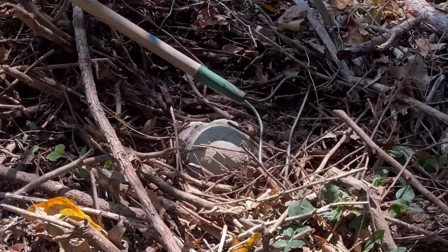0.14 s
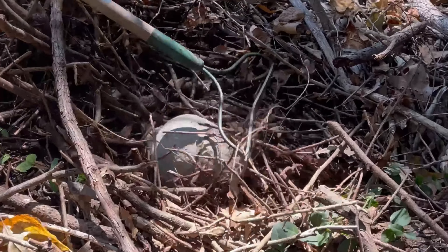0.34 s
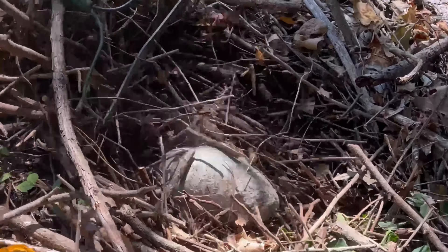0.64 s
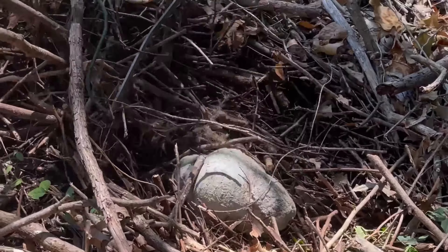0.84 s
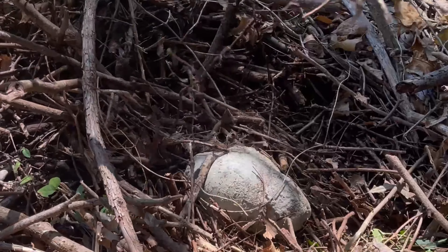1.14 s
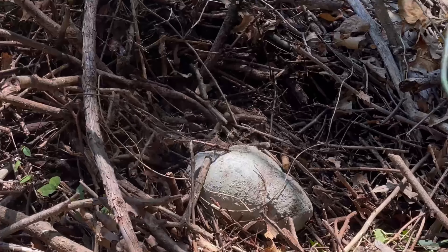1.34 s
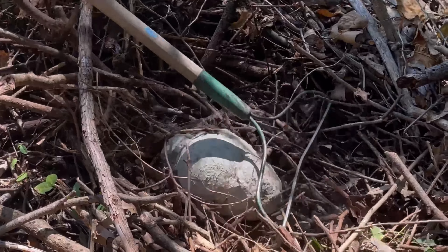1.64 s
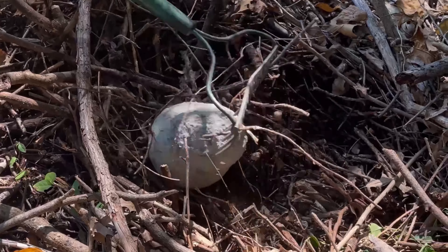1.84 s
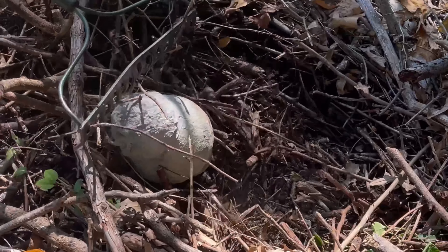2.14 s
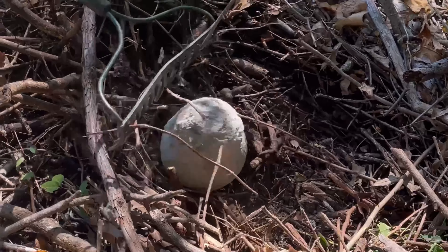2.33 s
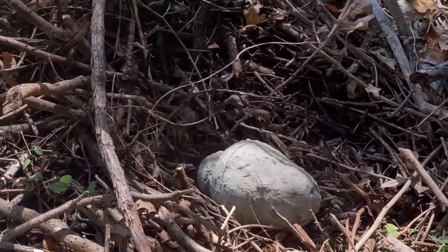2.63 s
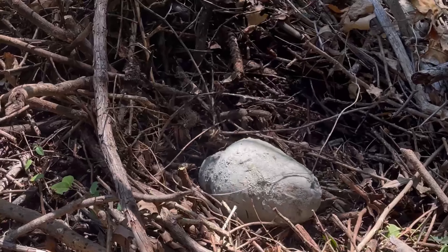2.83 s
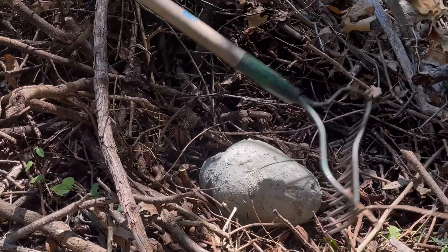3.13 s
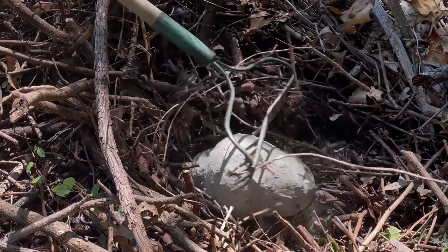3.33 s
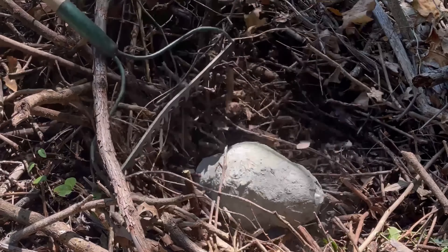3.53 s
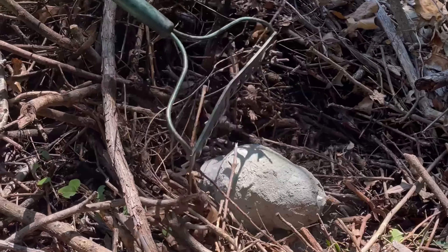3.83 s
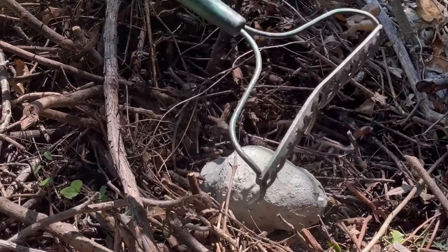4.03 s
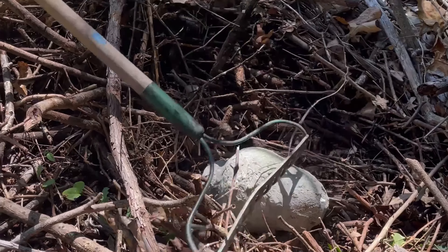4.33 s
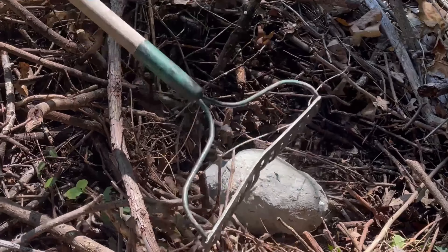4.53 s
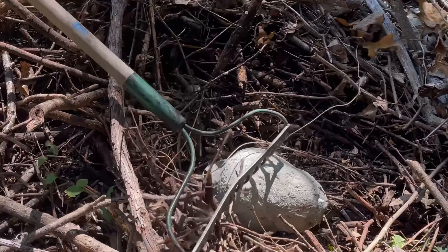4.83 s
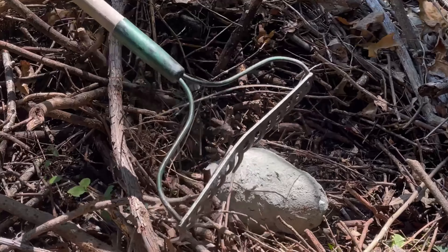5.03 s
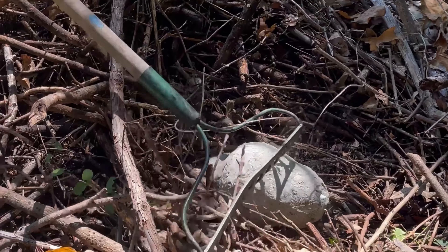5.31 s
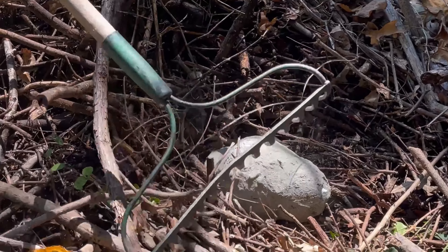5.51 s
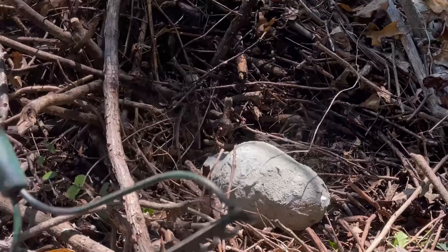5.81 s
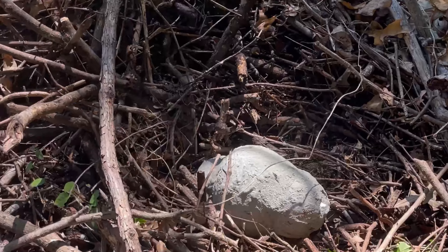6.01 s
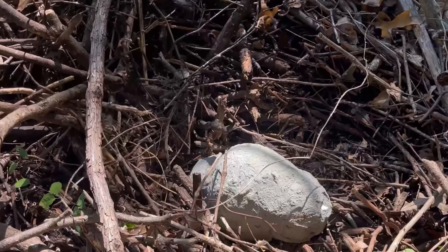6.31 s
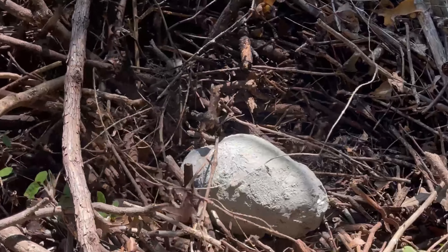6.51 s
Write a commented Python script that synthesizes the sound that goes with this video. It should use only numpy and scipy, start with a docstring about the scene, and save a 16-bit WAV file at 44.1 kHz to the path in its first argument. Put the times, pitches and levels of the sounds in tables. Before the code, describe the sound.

Dry litter rustles and twigs snap in fits as rake tines drag and flick, ringing briefly. Quiet gaps separate the strokes. Midway a sharp loud whack lands, followed by three spaced chopping hits with woody cracks and muted thuds, then dense crunchy snapping at the end. A soft far engine rumble and wavering whine continue underneath. Close stereo pickup in open air, crisp and dry.

```python
"""Thuds, crunches, metallic pings and snapping twigs, close by outdoors, over rustling leaves and a far engine.
A steel garden rake pokes and chops at a large puffball in a pile of dry twigs and dead leaves.
Hits are ragged decaying noise through spectra and resonances; the tines ring as decaying sines.
Leaves and twigs are random ticks and noise that follow the strokes.
The engine, perhaps an aircraft, is filtered noise and wavering tones; its rumble swells, its thin whine sinks."""
import sys
import numpy as np
from scipy import signal
from scipy.fft import rfft, irfft, next_fast_len
from scipy.io import wavfile
from scipy.ndimage import uniform_filter1d, map_coordinates

SR = 44100
rng = np.random.default_rng(int(sys.argv[2]) if len(sys.argv) > 2 else 0)


def transcribe(u):
    """Save the signal u as a 16-bit wav file named by the first command-line argument.

    u: samples, shape (n,) or (channels, n), limited to [-1, 1]; the rate is SR.
    q: integer samples, one column per channel.
    """
    v = np.clip(np.atleast_2d(u).T, -1, 1)
    q = np.round(v * 32767).astype(np.int16)
    wavfile.write(sys.argv[1], SR, q)


N = 293706

T = np.arange(N) / SR
AGE = T[:SR // 4]  # time since the start of a hit [s]
LEFT = np.array([[1], [-1]])  # signs of the left and right channel

# rake head landings, before fixed trims: (time [s], level [dB], thud re level [dB], crunch re level [dB],
# time scale of the litter giving way [s], hollow resonance [Hz], struck stick [Hz], stick re crack [dB])
BLOW_EVENTS = [(1.474, -29.5, -9, 2, 0.042, 397, 2300, -10), (1.491, -21, -11, 3.5, 0.069, 477, 2720, -12),
               (3.169, -6, -12, -31, 0.024, 754, 3020, -5), (4.3394, -5, -22, -17, 0.02, 530, 2750, -4.5),
               (4.356, -10.5, -17.5, -6.5, 0.023, 400, 2980, -4.5),
               (4.7894, -8.5, -13, -6, 0.024, 520, 2500, -4.5),
               (4.8073, -19.5, -10, -10, 0.02, 1100, 1800, -1),
               (5.2078, -5, -15.5, -31, 0.012, 680, 2840, -5),
               (5.2138, -17, -16, -17, 0.013, 1060, 2830, 8.5),
               (5.2226, -24, -10, -10, 0.0084, 900, 2620, -11),
               (6.4313, -18.5, -13, -1, 0.013, 406, 2210, -3),
               (6.4363, -38.5, 8, -14, 0.017, 250, 2400, -8),
               (6.5672, -16, -13, -12.5, 0.0053, 670, 2260, -2.5),
               (6.5803, -33.5, 2.5, -18.5, 0.0063, 486, 2200, -4)]
# free modes of the rake head, the first pair is the bending of the tines: (frequency [Hz], level [dB], t60 [s])
RAKE_MODES = [(1966, 7, 0.13), (1980, -3.5, 0.066), (2476, -6, 0.095), (2640, -10, 0.029),
              (3030, -14, 0.11), (3203, 0, 0.093), (3614, -4.5, 0.1), (4450, -3.5, 0.042),
              (4850, -9, 0.084), (5580, -8, 0.023), (5680, -15.5, 0.065), (5930, 1.5, 0.028),
              (7580, -6, 0.038), (8150, -3, 0.026)]
# spectrum of breaking wood: (frequency [Hz], level [dB])
CRACK_SPECTRUM = [(300, 3.5), (1200, -8.5), (1900, 6), (2600, 6), (3200, 4), (3700, -2.5), (4400, 4),
                  (5600, 1.5), (7000, -5), (12000, -63)]
# spectrum of crushed litter and sharp edges: (frequency [Hz], level [dB])
CRUNCH_SPECTRUM = [(300, -6), (2000, -9), (4500, -3.5), (6000, -0.5), (8000, -0.5), (10200, 9.5),
                   (11200, 6.5), (12200, -10.5), (14000, -32)]


def undb(db):
    """Decibels to gain."""
    return 10 ** (np.asarray(db) / 20)


def unit(x):
    """Scale to an rms of 1."""
    return x / np.sqrt(np.mean(x ** 2))


def burst(x):
    """Scale a hit so that its loudest 4 ms have an rms of 1."""
    power = uniform_filter1d(np.mean(x ** 2, axis=0), size=176)
    return x / np.sqrt(power.max())


def curves(table):
    """The columns of a table, joined by straight lines in time."""
    time_s, *columns = np.transpose(table)
    return [np.interp(T, time_s, column) for column in columns]


def colour(x, spectrum):
    """Minimum-phase filter with the given spectrum, by folding the cepstrum."""
    points_hz, points_db = np.transpose(spectrum)
    n = next_fast_len(x.shape[-1] + len(AGE), True)
    hz = np.maximum(np.arange(n // 2 + 1) * SR / n, 1)
    gain = undb(np.interp(np.log(hz), np.log(points_hz), points_db))
    cepstrum = irfft(np.log(gain), n)
    cepstrum[1:n // 2] *= 2
    cepstrum[n // 2 + 1:] = 0
    response = np.exp(rfft(cepstrum))
    return irfft(rfft(x, n) * response, n)[..., :x.shape[-1]]


def resonate(x, hz, q):
    """One resonance, gain 1 at its centre."""
    b, a = signal.iirpeak(hz, q, fs=SR)
    return signal.lfilter(b, a, x)


def noise(n, spread):
    """Left and right noise: a shared part and an opposed part of weight spread."""
    mid, side = rng.standard_normal((2, n))
    return np.array([mid + spread * side, mid - spread * side])


def walk(rate_hz):
    """Smooth random wander, rms 1, through rate_hz random knots a second."""
    knots = rng.standard_normal(4096)
    return unit(map_coordinates(knots, [T * rate_hz], order=3, mode="wrap"))


def fade(t60_s):
    """Exponential decay, 60 dB down after t60_s."""
    return np.exp(-np.log(1000) * AGE / t60_s)


def add(track, time_s, sound):
    """Mix a sound into the track at time_s."""
    i = int(time_s * SR)
    track[:, i:i + sound.shape[1]] += sound[:, :max(N - i, 0)]


def splinters(spread, ragged_db, rise_s):
    """Noise that swells and comes in ragged millisecond spurts, as fibres break one after another."""
    spurts = np.repeat(rng.standard_normal(len(AGE)), 44)[:len(AGE)]
    swell = 1 - np.exp(-AGE / rise_s)
    return noise(len(AGE), spread) * undb(ragged_db * spurts) * swell


def blows():
    """The head thuds into the soft mass, crunches litter and cracks a stick, which rings and shakes the steel."""
    # (frequency [Hz], level [dB])
    thud_spectrum = [(60, -28), (200, -4), (330, 19.5), (520, 16.5), (750, 17.5), (1100, 22), (1500, 1),
                     (2500, -4), (8000, -37)]
    out = np.zeros((2, N))
    for time_s, level_db, thud_db, crunch_db, give_s, hollow_hz, stick_hz, stick_db in BLOW_EVENTS:
        impact = splinters(spread=0.19, ragged_db=8.0, rise_s=0.00037) * fade(1.62 * give_s)
        mass = burst(colour(impact, thud_spectrum))
        hollow = burst(resonate(impact, hollow_hz, q=3))
        thud = (0.9 * mass + 0.7 * hollow) * undb(2.5 * LEFT)

        fracture = splinters(spread=0.78, ragged_db=1.0, rise_s=0.0004) * fade(4.3 * give_s)
        steel = np.zeros_like(fracture)
        for hz, mode_db, t60_s in RAKE_MODES:
            q = np.pi * hz * 0.7 * t60_s / np.log(1000)  # rings for 0.7 of the free time
            steel += undb(mode_db) * resonate(fracture, hz, q)
        knock = splinters(spread=0.37, ragged_db=0.0, rise_s=0.00027) * fade(2.8 * give_s)
        stick = resonate(knock, stick_hz, q=7)
        crack = undb(-10.0) * burst(colour(fracture, CRACK_SPECTRUM))
        crack += undb(-16.5) * burst(steel) + undb(stick_db - 4.5) * burst(stick)

        settling = fade(give_s) + undb(-12.5) * fade(0.29)
        crunch = colour(splinters(spread=0.19, ragged_db=4, rise_s=0.0002) * settling, CRUNCH_SPECTRUM)
        hit = crack + undb(thud_db + 7.5) * burst(thud) + undb(crunch_db + 0.5) * burst(crunch)
        add(out, time_s, undb(level_db) * hit)
    return out


def pings():
    """A tick sets the steel ringing; each contact point favours other modes, and the litter damps them fast."""
    # tine flicks off a stick, before fixed trims: (time [s], level [dB], upper modes re level [dB],
    # tick re level [dB], chatter re level [dB], ring time re free [ratio], favoured mode [Hz])
    ping_events = [(0.4613, -27, 10.5, 10, 3.5, 1, 5650), (0.4712, -21.5, 6.5, 1, -15, 0.37, 2480),
                   (0.4933, -27, 3, -1, -14, 0.56, 2420), (0.5501, -26.5, 3, 12, -10, 0.46, 2500),
                   (1.508, -32, 6, 6, -13, 0.88, 3660), (1.5917, -44, 15, 15, -6, 0.56, 3600),
                   (1.6282, -31.5, 5, -22, -21, 0.54, 3530), (2.1257, -28.5, 8, -10, -2.5, 1, 3320),
                   (2.631, -23, 15.5, -6, -2.5, 0.37, 3600), (2.6385, -21.5, -5, -9, -15, 1, 4330),
                   (2.6466, -31, -2, -17, -15, 0.76, 3250), (2.6626, -33, 2, 6, -15, 0.48, 3610),
                   (2.6953, -27.5, -2, -14, -14, 0.73, 3250), (2.7172, -25, -3, -12, -15, 0.65, 3620),
                   (3.171, -30, 9, 20.5, 1, 0.32, 3250), (3.1883, -26, 0, 6, -5, 0.7, 3210),
                   (3.5162, -35.5, -24, -17, -30, 0.36, 2470), (4.341, -24.5, 20.5, 14, 3, 0.54, 3450),
                   (4.3574, -38, -1, 8, 2, 0.54, 3230), (4.79, -31.5, 24.5, 26, -1, 0.41, 3440),
                   (4.8084, -30, -3, -8, -14, .6, 2450), (5.2095, -19, 12.5, 11, -17, 0.53, 3430),
                   (5.2147, -26, 12, -2, -12, 0.83, 6160), (5.223, -27, -7, -3, -11, 0.91, 3630)]
    out = np.zeros((2, N))
    hz, mode_db, t60_s = np.transpose(RAKE_MODES)
    upper = np.arange(len(RAKE_MODES)) > 1
    for time_s, level_db, upper_db, tick_db, chatter_db, freedom, favoured_hz in ping_events:
        detune, skew, start = rng.standard_normal((3, len(RAKE_MODES)))
        gain = undb(mode_db + 14.0 * np.exp(-((hz - favoured_hz) / 250) ** 2))
        decays = np.array([fade(t * freedom) for t in t60_s])
        # sticks pressed against the tines shift the modes a little
        phase = 2 * np.pi * np.outer(hz * (1 + 0.004 * detune), AGE)
        phase += (np.pi * upper * start)[:, None]
        modes = np.array([decays * np.sin(phase + side * 0.3 * skew[:, None]) for side in (1, -1)])
        ring = undb(1.0) * burst((gain * ~upper) @ modes)
        ring += undb(upper_db - 7.0) * burst((gain * upper) @ modes)

        tick_decay = fade(0.013) + undb(-6) * fade(0.12)
        tick = colour(splinters(spread=1.0, ragged_db=2, rise_s=0.00022) * tick_decay, CRUNCH_SPECTRUM)
        chatter = colour(splinters(spread=1.0, ragged_db=3.5, rise_s=0.00034) * fade(0.14), CRACK_SPECTRUM)
        hit = ring + undb(tick_db - 5.0) * burst(tick) + undb(chatter_db) * burst(chatter)
        add(out, time_s, undb(level_db) * hit)
    return out


def snaps():
    """A sudden fracture rings the twig, briefly if it lies buried and longer if free, and scatters in the pile."""
    # twig snaps, before fixed trims: (time [s], level [dB], twig pitch [Hz], wood re level [dB],
    # scatter t60 [s], ring sharpness [Q])
    snap_events = [(0.0442, -18, 6400, -19, 0.07, 6), (0.3635, -16.5, 4240, -2, 0.028, 30),
                   (0.4397, -14, 2600, -8, 0.061, 20), (0.4927, -11, 2470, -4, 0.016, 8),
                   (0.523, -25, 1200, 1, 0.04, 9), (0.5478, -6, 3560, -16, 0.026, 8),
                   (0.5605, -21, 3500, -8, 0.035, 14), (0.5648, -17, 2900, -10, .025, 10),
                   (0.6046, -18, 5940, -11, 0.035, 8), (0.612, -17, 6030, -19, 0.064, 8),
                   (0.649, -18, 3000, -14, 0.044, 2.4), (0.8187, -20.5, 6800, -12, 0.21, 7),
                   (1.0685, -11.5, 2470, 6.5, 0.011, 2.8), (1.0698, -14.5, 3570, 1.5, .012, 3.4),
                   (1.262, -30, 6040, -8, .04, 6), (1.403, -34, 5500, -3, .03, 5),
                   (1.461, -19, 5200, -17, 0.057, 7), (1.469, -16, 6300, -12, 0.075, 7),
                   (1.48, -12.5, 5500, -3, 0.23, 6), (1.488, -15, 3280, -2, .03, 7),
                   (1.503, -17, 3000, 1, .04, 7), (1.52, -19, 4600, -1, .07, 7),
                   (1.5545, -14.5, 4050, 5, 0.037, 9.9), (1.779, -13.5, 2580, -9, 0.044, 50),
                   (1.899, -13.5, 2760, 4.5, 0.0078, 8.7), (1.9852, -14.5, 2680, -17, 0.028, 14),
                   (2.0647, -13.5, 6700, -4, 0.069, 7), (2.089, -22, 3010, -4, 0.035, 20),
                   (2.108, -22, 3230, 0, .03, 25), (2.116, -12, 2550, -7, 0.047, 27),
                   (2.1257, -21, 5560, 19, 0.033, 10), (2.127, -25, 4530, 17, 0.05, 8.8),
                   (2.162, -20.5, 6200, 0, 0.062, 7), (2.193, -16.5, 6000, -8, 0.05, 7),
                   (2.201, -11.5, 6340, -16, 0.057, 7), (2.536, -20, 5530, 5, 0.028, 6.1),
                   (2.554, -18, 5700, -13, 0.033, 6.5), (2.7067, -14.5, 5100, -8, 0.067, 7),
                   (2.7924, -24.5, 5500, 5.5, 0.016, 6), (2.792, -30, 1400, 12.5, 0.015, 4),
                   (2.881, -26, 6040, -17, .015, 6), (3.17, -12, 4000, 7, 0.046, 3.3),
                   (3.17, -16, 5570, 16, .02, 12), (3.1757, -13, 5300, 9, 0.035, 8),
                   (3.184, -17, 3180, 8, .04, 18), (3.33, -11.5, 2940, -9, 0.033, 63),
                   (3.33, -16.5, 5700, 1, .026, 8), (3.378, -14, 2980, -4, 0.022, 18),
                   (3.378, -18, 5700, 4.5, 0.028, 5.2), (3.7573, -16, 2735, -13, 0.037, 14),
                   (4.132, -22.5, 6000, -8, 0.056, 7), (4.3528, -8, 4900, -26, 0.034, 6),
                   (4.356, -13, 3200, 7, 0.017, 7), (4.4323, -16, 5200, -20, 0.053, 7),
                   (4.577, -19, 5470, 1.5, 0.05, 4.4), (4.79, -24, 3300, 9, .012, 6),
                   (4.791, -16, 7340, 11, 0.024, 6), (4.8067, -12, 6000, -6, 0.036, 5.2),
                   (5.208, -16, 7800, 9, 0.043, 6), (5.341, -19.5, 6500, -15, 0.033, 7),
                   (5.375, -23, 6500, -15, .015, 7), (5.397, -19, 6200, -12, 0.024, 7),
                   (5.5782, -23.5, 2560, 14, 0.0067, 2.3), (5.601, -25.5, 6800, -3, 0.039, 7),
                   (5.945, -22, 2620, 3, 0.01, 15), (5.961, -16, 6260, -8, .03, 8),
                   (6.044, -10.5, 5400, 5.5, 0.041, 7.2), (6.0465, -9, 4750, -2, 0.059, 36),
                   (6.0485, -12.5, 7400, 4, .03, 14), (6.0755, -11, 2180, -7.5, 0.1, 16),
                   (6.111, -9.5, 5700, -16, 0.018, 8), (6.111, -16, 2200, 1.5, 0.021, 4.3),
                   (6.1743, -17, 5540, -7, 0.045, 8), (6.2371, -11.5, 2966, -10, 0.037, 18),
                   (6.3194, -13, 3960, -15, 0.029, 3.3), (6.4051, -12, 1600, -10, 0.02, 3),
                   (6.445, -11, 5730, -4, 0.026, 7), (6.46, -14, 2700, -3, .025, 12),
                   (6.507, -20, 2720, 0, .015, 12), (6.522, -17, 2440, -3.5, 0.03, 12),
                   (6.6057, -7.5, 5600, -14, 0.063, 10), (6.6171, -1, 5840, -12, 0.017, 8.2)]
    # a crooked twig also rings in a second plane: share above its pitch, level
    second_split, second_db = 0.068, -13
    out = np.zeros((2, N))
    for time_s, level_db, hz, wood_db, scatter_s, q in snap_events:
        decay = fade(0.0035) + undb(-6.5) * fade(scatter_s)
        fracture = splinters(spread=1.0, ragged_db=1.5, rise_s=0.00024) * decay
        edge = burst(colour(fracture, CRUNCH_SPECTRUM))
        bend = resonate(fracture, hz, q=1)
        twig = burst(resonate(bend, hz, q))
        twig += undb(second_db) * burst(resonate(bend, hz * (1 + second_split), q=2.9))
        body = burst(resonate(resonate(fracture, 2500, q=1), 580, q=1))
        body *= 3800 / hz  # thick, low twigs have more body
        wood = undb(-13.0) * burst(twig) + undb(-27.0) * body
        add(out, time_s, undb(level_db) * (undb(-8.5) * edge + undb(wood_db) * wood))
    return out


def squeaks():
    """A tine squeaks along a twig: a thin, rough note of resonant noise that swells and stops."""
    # (time [s], length [s], level [dB], pitch [Hz])
    squeak_events = [(0.402, 0.05, -40, 5700), (2.598, 0.025, -39, 5520)]
    out = np.zeros((2, N))
    for time_s, length_s, level_db, hz in squeak_events:
        pressure = np.sin(np.pi * np.minimum(AGE / length_s, 1))
        note = resonate(noise(len(AGE), spread=0.3) * pressure, hz, q=27)
        add(out, time_s, undb(level_db) * burst(note))
    return out


def rustle():
    """Dry leaves hiss under the resting tines; in a stroke edges tick and dragged twigs crackle, in fits and starts."""
    # (frequency [Hz], level [dB])
    leaf_spectrum = [(150, -9), (600, -3), (2300, -1.5), (4000, -8.5), (5200, -1.5), (6800, 0.5),
                     (8500, 1.5), (10400, 10), (11300, 4), (12200, -10.5), (14000, -40)]
    rest, stir, scrape = stirring()
    ticks = grains(np.geomspace(2500, 11500, num=14), rate_hz=45, scatter_db=4.2, q=4, tail_s=0.02)
    sliding = unit(noise(N, spread=0.068))
    twigs = grains(np.geomspace(1500, 6000, num=10), rate_hz=26, scatter_db=4.5, q=16, tail_s=0.015)
    twigs = unit(resonate(twigs, 3000, q=1))
    catch = unit(undb(2.6 * walk(68)))  # a dragged tine catches and slips: the level wanders
    resting = unit(colour(0.6 * ticks + sliding, leaf_spectrum))
    moving = unit(colour(ticks + 0.4 * sliding, leaf_spectrum))
    share = stir / (rest + stir)
    leaves = (1 - share) * resting + share * moving * catch
    return np.hypot(rest, stir) * leaves + scrape * catch * twigs


def grains(pitches_hz, rate_hz, scatter_db, q, tail_s):
    """Random ticks, most of them faint, rate_hz a second at each pitch, each with a short scattered tail."""
    out = np.zeros((2, N))
    for hz in pitches_hz:
        chance = rng.random(N)
        size = np.minimum(rng.exponential(size=N), 3)
        hits = (chance < rate_hz / SR) * undb(scatter_db * size)
        crinkle = noise(len(AGE), spread=0.7) * (fade(0.005) + undb(-12) * fade(tail_s))
        grain = 2.9 * unit(crinkle) + unit(resonate(crinkle, hz, q))
        out += signal.fftconvolve(hits[None], grain, axes=1)[:, :N]
    return unit(out)


def push(peak_s, level_db, swell_s, settle_s):
    """Power of one movement: it swells 20 dB in swell_s up to peak_s, then falls 20 dB in settle_s."""
    away = np.maximum((peak_s - T) / swell_s, (T - peak_s) / settle_s)
    return undb(level_db - 20 * away) ** 2


def stirring():
    """Gains of resting leaves, moving leaves and twigs: strokes move leaves and twigs; blows shake only leaves."""
    # strokes through the litter: (hardest push [s], leaves [dB], twigs [dB], 20 dB swell [s], 20 dB settling [s])
    stroke_events = [(0.06, -39, -50, 0.044, 0.078), (0.565, -22.5, -39.5, 0.28, 0.13),
                     (0.85, -41.5, -72, 1, 1), (1.492, -32, -22, 0.026, 0.034),
                     (2.105, -32.5, -44, 0.69, 0.13), (2.55, -38, -56, 0.67, 0.11),
                     (3.35, -35, -42, 0.11, 0.34), (3.76, -38, -49, 0.28, 0.18),
                     (5.359, -46, -66, 0.072, 1), (5.66, -37, -58, 0.58, 0.098),
                     (5.949, -29, -44, 0.06, 0.12), (6.095, -23, -39, 0.094, 0.12),
                     (6.24, -34, -48, 0.48, .35), (6.445, -26.5, -34.5, 0.037, 0.25)]
    # the tines lie in the litter: (start [s], end [s])
    contact_spans = [(0, 1.2), (1.47, 2.88), (3.17, 5.8), (5.92, 8.3)]
    contact_db, lifted_db, lift_s = -48.5, -60, 0.059  # under the resting tines, left alone, lifting time
    # leaves shaken by a blow: level re blow, time from blow to peak, 20 dB times
    shake_db, shake_delay_s, shake_swell_s, shake_settle_s = -32, 0.0025, 0.061, 0.15

    touching = sum(1.0 * ((T >= start_s) & (T < end_s)) for start_s, end_s in contact_spans)
    touching = uniform_filter1d(touching, int(lift_s * SR))
    resting = undb(lifted_db) ** 2 + touching * undb(contact_db) ** 2
    leaves, twigs = np.zeros(N), np.zeros(N)
    for time_s, level_db, *_ in BLOW_EVENTS:
        leaves += push(time_s + shake_delay_s, level_db + shake_db, shake_swell_s, shake_settle_s)
    for peak_s, leaves_db, twigs_db, swell_s, settle_s in stroke_events:
        stroke = push(peak_s, 0, swell_s, settle_s)
        leaves += undb(leaves_db) ** 2 * stroke
        twigs += undb(twigs_db) ** 2 * stroke
    return np.sqrt(resting), np.sqrt(leaves), np.sqrt(twigs)


def engine():
    """Far-off rumble and rush, with tones smeared by the moving air; whine and drone sink together."""
    # (time [s], rumble [dB], rush [dB])
    noise_levels = [(0, -34, -41), (1.3, -32, -41.5), (2.7, -31, -38), (3.3, -30.5, -38.5), (3.6, -27, -37),
                    (4.4, -29, -36), (5.1, -27, -35.5), (6.0, -30, -37), (6.66, -32, -36)]
    # (time [s], whine pitch [Hz], whine [dB], drone [dB], hum [dB])
    tone_levels = [(0, 1234, -57, -79, -63), (1.3, 1235, -52, -69, -48), (2.1, 1215, -51, -62, -36),
                   (2.7, 1208, -48, -63, -35), (3.3, 1185, -56, -66, -43), (3.85, 1207, -47.5, -45, -41.5),
                   (4.6, 1135, -50, -53, -36), (4.85, 1103, -45.5, -42, -43.5), (5.15, 1096, -49, -43, -37),
                   (5.3, 1106, -46.5, -72, -42), (5.55, 1089, -38.5, -61, -34), (5.74, 1074, -39, -63, -39),
                   (5.83, 1091, -49, -70, -39), (5.98, 1082, -36.5, -91, -43), (6.15, 1080, -47, -72, -38),
                   (6.26, 1080, -41.5, -72, -33), (6.36, 1080, -53, -72, -45), (6.66, 1072, -41, -72, -48)]
    # second, purer whine that roughly holds its pitch: (time [s], pitch [Hz], level [dB])
    held_levels = [(0, 1231, -59), (0.55, 1240, -51), (0.72, 1242, -59), (1.2, 1228, -51),
                   (1.28, 1192, -41), (1.33, 1243, -56), (2.7, 1241, -49), (3.6, 1229, -52),
                   (5.5, 1222, -66), (6.1, 1233, -56), (6.27, 1214, -43), (6.4, 1213, -49),
                   (6.66, 1220, -51)]
    # (frequency [Hz], level [dB])
    rumble_spectrum = [(15, -62), (28, -20), (42, -12.5), (60, -2), (83, 1.5), (110, -4.5), (150, -6),
                       (220, -10), (300, -21.5), (500, -31.5), (1500, -86)]
    # (frequency [Hz], level [dB])
    rush_spectrum = [(100, -5), (300, -2), (550, -3), (830, 1.5), (1000, -1.5), (1200, -2.5), (1600, -6.5),
                     (2500, -7.5), (3800, -14), (5200, -16), (7000, -12.5), (9000, -24.5), (12500, -63)]

    rumble_db, rush_db = curves(noise_levels)
    whine_hz, whine_db, drone_db, hum_db = curves(tone_levels)
    held_hz, held_db = curves(held_levels)
    rumble = undb(rumble_db + 0.57 * walk(5.9)) * unit(colour(noise(N, spread=0.45), rumble_spectrum))
    rush = undb(rush_db + 0.84 * walk(5.01)) * unit(colour(noise(N, spread=1), rush_spectrum))
    boom = wavering_tone(84.5, rumble_db - 9, smear_hz=22, spread=0.3, steady=0)
    hum = wavering_tone(139.8, hum_db, smear_hz=16, spread=0.062, steady=0.25)
    whine = wavering_tone(whine_hz, whine_db, smear_hz=70, spread=0.6, steady=0.12)
    drone = wavering_tone(0.31 * whine_hz, drone_db, smear_hz=16, spread=0.5, steady=1.8)
    held = wavering_tone(held_hz, held_db, smear_hz=32, spread=0.6, steady=1.0)
    return rumble + rush + boom + hum + whine + held + drone


def wavering_tone(hz, level_db, smear_hz, spread, steady):
    """A tone with a steady part and a part scattered in phase and level; gusts make it swell and fade."""
    phase = 2 * np.pi * np.cumsum(hz * np.ones(N)) / SR
    mid, side = (unit(walk(smear_hz) * np.cos(phase) + walk(smear_hz) * np.sin(phase)) for _ in range(2))
    mid = unit(mid + steady * unit(np.cos(phase + 0.81 * walk(9))))
    swell = unit(undb(1.64 * np.sqrt(hz / 1000) * walk(13)))  # short waves suffer most from the wind
    return undb(level_db) * swell * np.array([mid + spread * side, mid - spread * side])


def scene():
    """The rake works a little to the left; the litter and the engine are all around."""
    rake = undb(1.0 * LEFT) * (blows() + pings())  # 1 dB up on the left, 1 dB down on the right
    return rake + snaps() + squeaks() + rustle() + engine()


def record(dry):
    """Two close ports share the bass and the top; the right one lags in the treble; peaks are rounded, the top cut."""
    # difference between the microphone ports: (frequency [Hz], side gain [dB])
    port_width = [(30, -3), (70, -12), (160, -15), (280, -13), (520, -3), (900, -1), (1100, 0), (3000, -.5),
                  (4200, 0), (4700, -7), (6500, -9), (8500, -16), (12000, -22)]
    # phase lag of the right port: (frequency [Hz], lag [rad])
    port_lag = [(0, 0), (300, 0), (700, 1.1), (850, 1.8), (1050, 4.3), (1400, 5.1), (1950, 6.4),
                (2900, 5.5), (3300, 6), (4000, 6.6), (4600, 9.1), (5000, 10.5), (5600, 12.2), (8000, 14.7),
                (9400, 15.7), (12200, 18.8), (22050, 27.3)]
    hz = np.arange(N // 2 + 1) * SR / N
    left, right = rfft(dry)
    mid = (left + right) / 2
    side = (left - right) / 2 * undb(np.interp(hz, *np.transpose(port_width)))
    lag_rad = np.interp(hz, *np.transpose(port_lag))
    ports = irfft(np.array([mid + side, (mid - side) * np.exp(-1j * lag_rad)]), N)
    rounded = 0.8 * np.tanh(ports / 0.8)
    low_pass = signal.ellip(6, 0.3, 60, 13300, fs=SR, output="sos")  # ripple, stop [dB], edge [Hz]
    return signal.sosfilt(low_pass, rounded)


dry = scene()
out = record(dry)
transcribe(out)
```